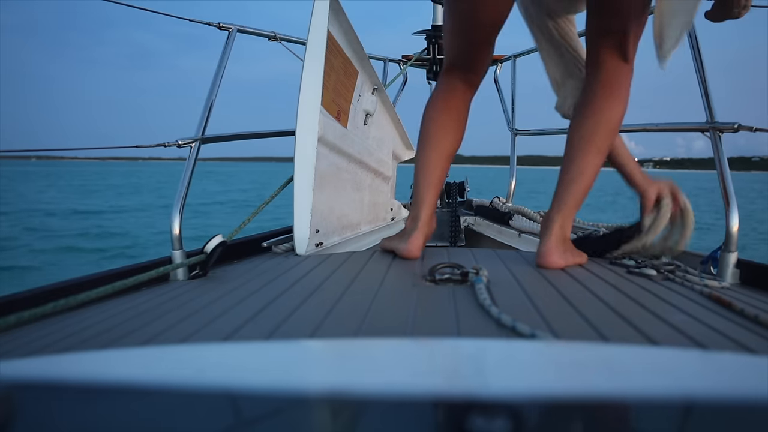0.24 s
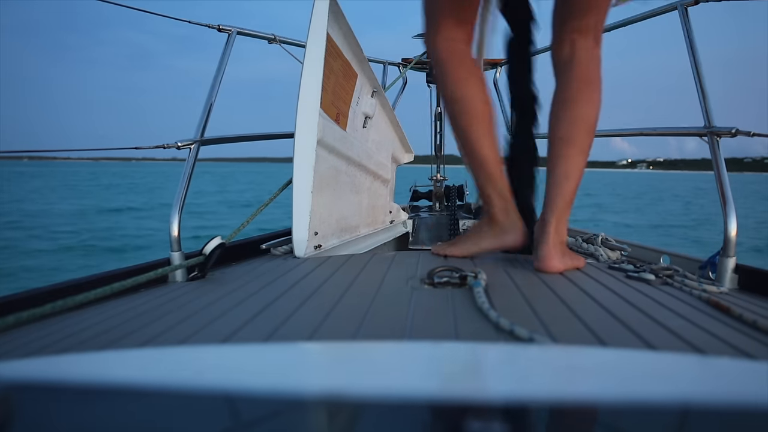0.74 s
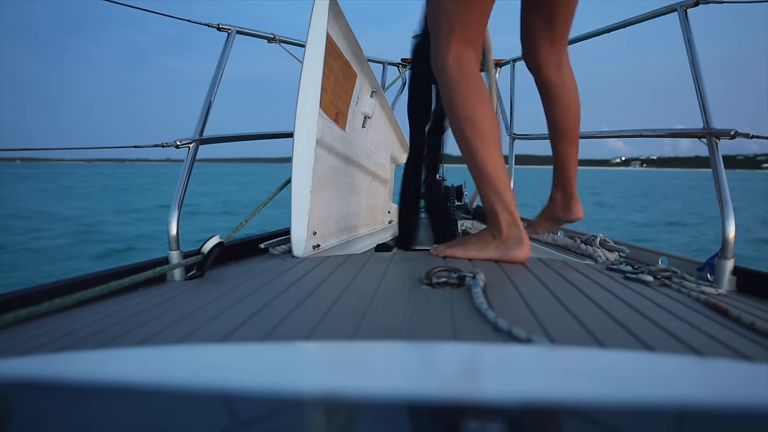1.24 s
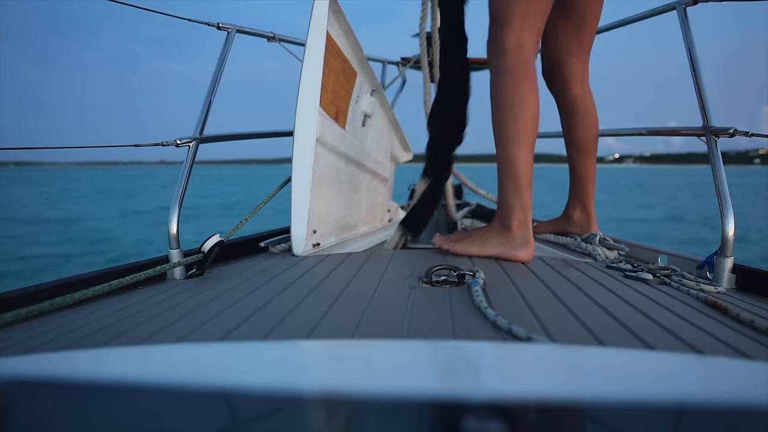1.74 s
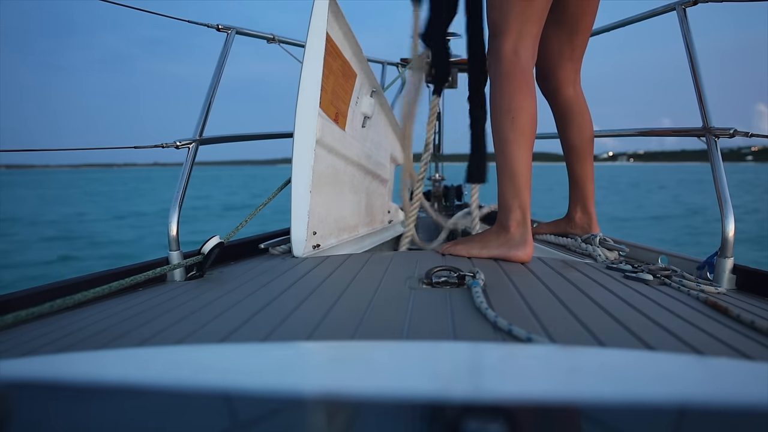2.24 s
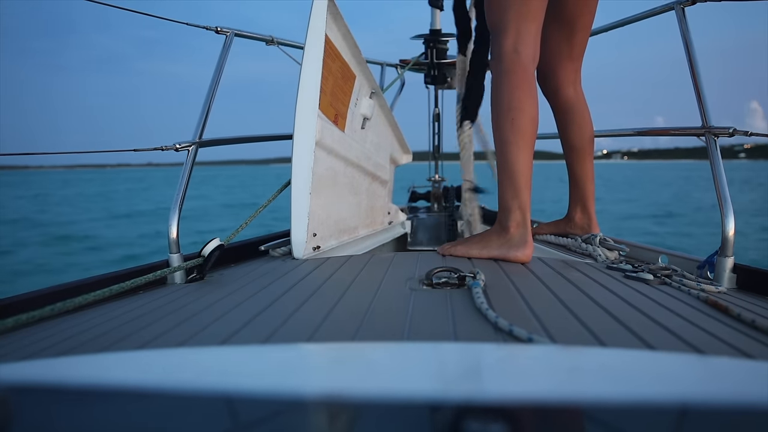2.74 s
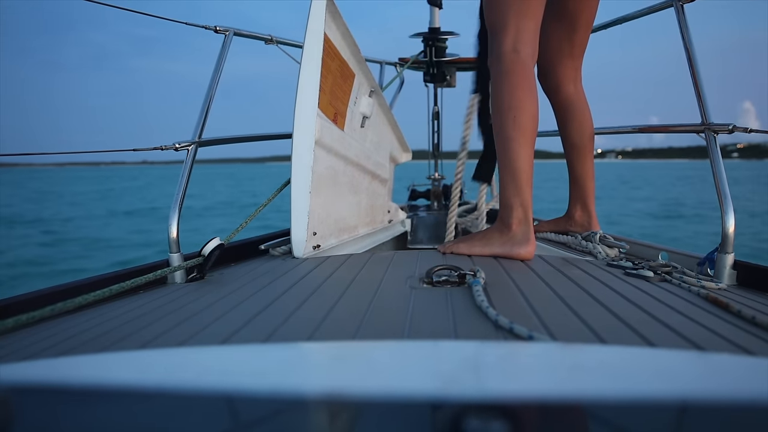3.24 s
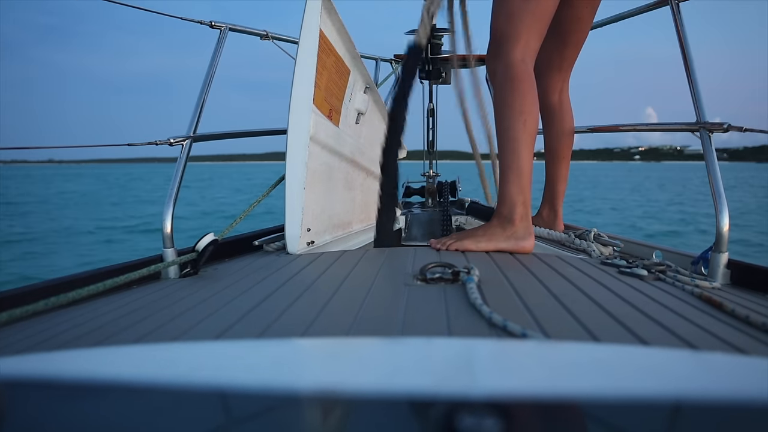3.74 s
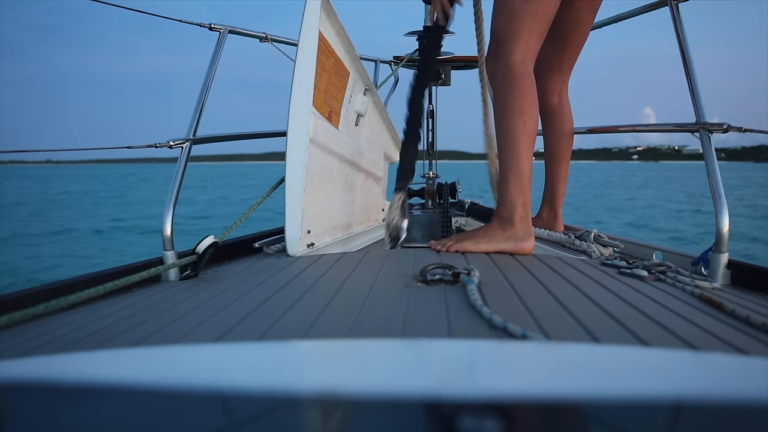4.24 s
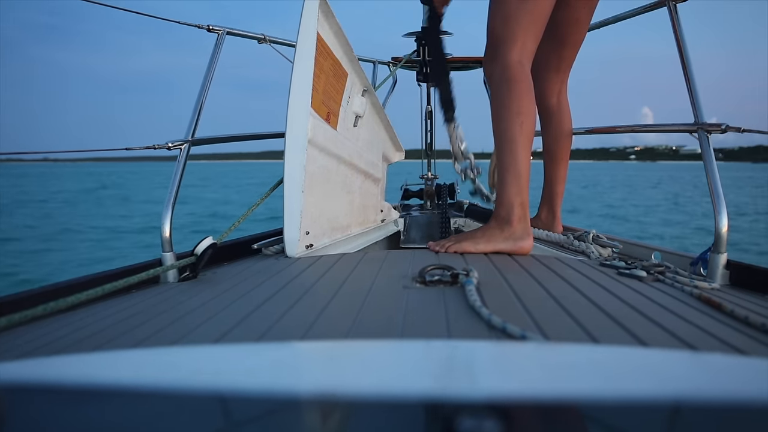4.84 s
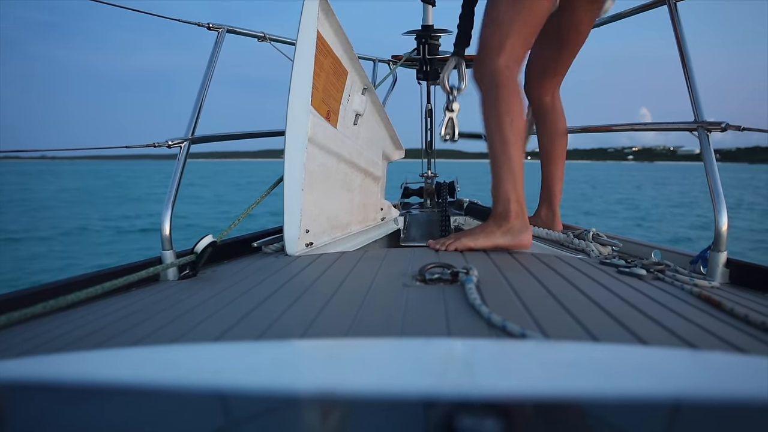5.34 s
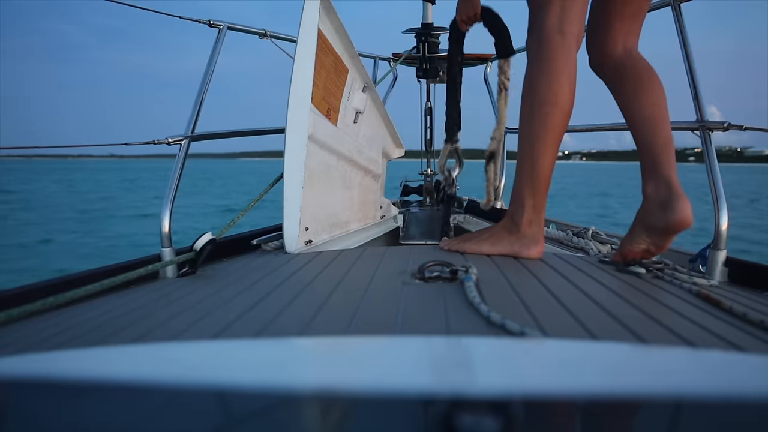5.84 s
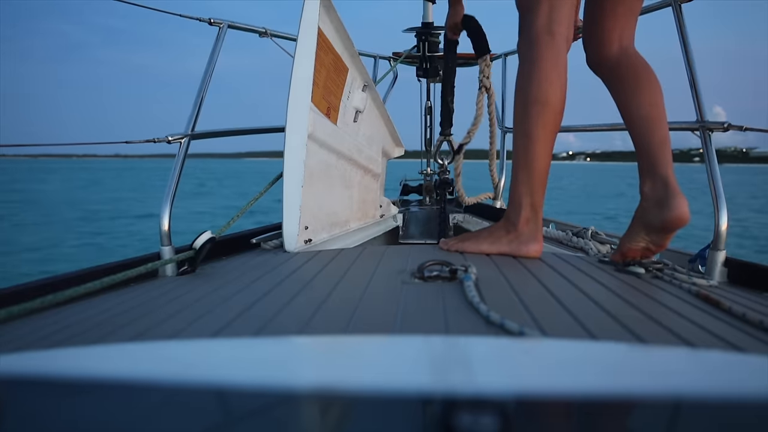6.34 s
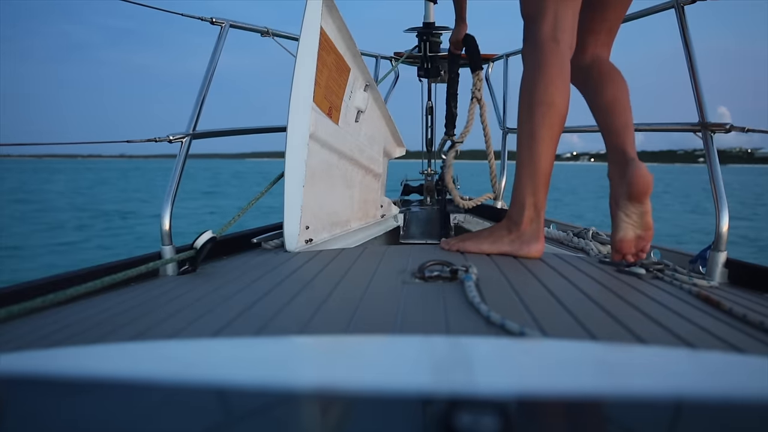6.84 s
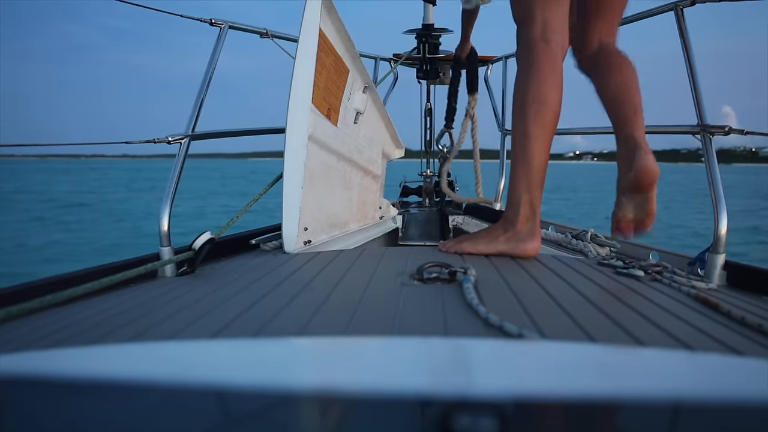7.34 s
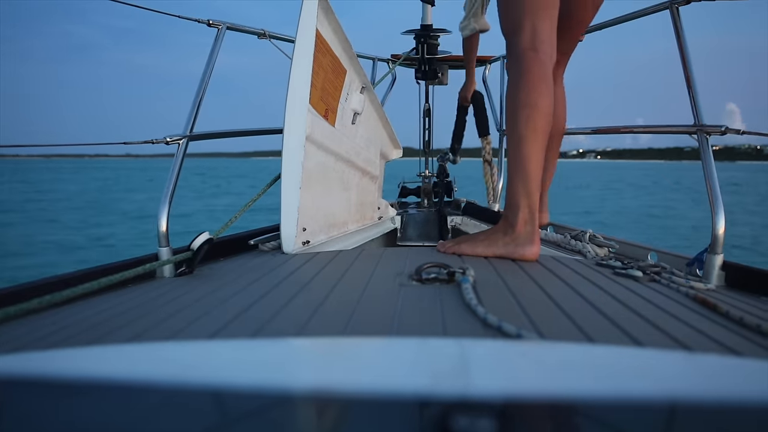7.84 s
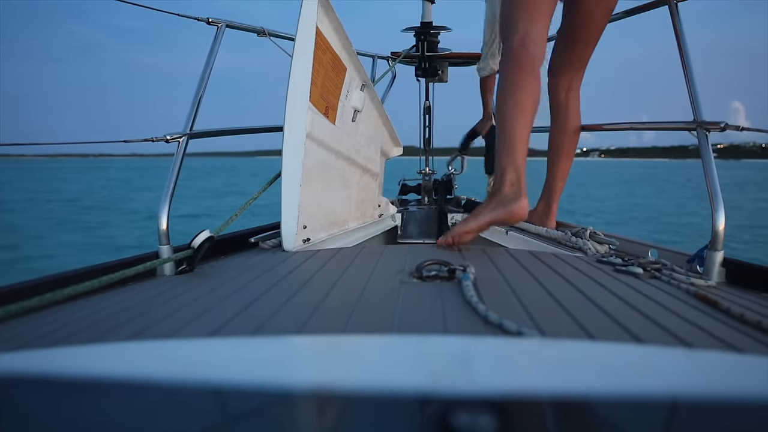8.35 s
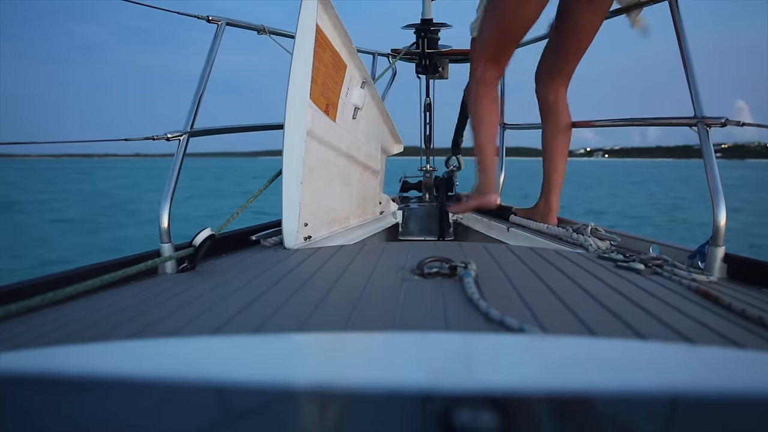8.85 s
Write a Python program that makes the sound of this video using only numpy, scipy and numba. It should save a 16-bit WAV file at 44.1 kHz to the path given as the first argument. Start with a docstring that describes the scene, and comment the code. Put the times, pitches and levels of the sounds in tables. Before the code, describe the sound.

On a boat's bow, wind rumbles deep and uneven at a close microphone, with hard buffets near 0.1, 0.4, 1.1 and 2.65 s, some with tiny clicks, over a faint water wash. Rope and bare feet brush the deck quietly, a small tap at 0.7 and a dull rub at 2.6. Rope slaps a hollow panel around 3.1 to 3.3. At 3.5 a buffet and sharp clink arrive together; knocks build to a loud bright clank at 4.1, the hook ringing on briefly. Quieter wind, light ticks and footfalls follow until a short clink at 5.5. From 5.7 chain runs over drum and roller: dense grinding rattle, hollow knocks, steel cracks, the hardest at 6.9, a faint high whistle. It thins around 7.5 to 7.9, bursts sharply and brightly at 8.0 to 8.2, surges weakly at 8.7, then ends in low grinding, sparse clinks and a dull step near 9.

```python
"""Anchor chain on a windy foredeck

On a yacht at anchor a rope bridle is handled, and its hook, made of ringing modes, knocks and clinks on the chain.
Then the windlass runs: swarms of impacts and struck modes grind and clatter over drum and bow roller and drum
the hollow deck. Wind rumbles and shoves at the microphone, with clicks as the recorder's gain steps down, over a
faint wash of water. All but the wind sits dead centre, with no distance or echo added; a limiter ducks on
strong gusts and blows."""
import sys
import numpy as np
from scipy import signal
from scipy.fft import rfft, irfft
from scipy.io import wavfile
from scipy.ndimage import uniform_filter1d
from numba import njit

SR = 44100
rng = np.random.default_rng(int(sys.argv[2]) if len(sys.argv) > 2 else 0)


def output_pcm(signal):
    """Save a mono or channel-first signal as 16-bit PCM at the path in sys.argv[1].

    Samples are clipped to [-1, 1] before scaling.
    """
    pcm = np.clip(np.atleast_2d(signal).T, -1, 1) * 32767
    wavfile.write(sys.argv[1], SR, np.round(pcm).astype(np.int16))


N = 400863
TIME = np.arange(N) / SR
SIZE = 2 ** 14  # filter length in samples
FREQ = np.arange(SIZE // 2 + 1) * SR / SIZE

# Level columns are relative: functions may add their own trims in dB.
# Spectra give only a shape: colour() scales each one to unit power.


def amp(db):
    """Decibels to gain."""
    return 10 ** (np.asarray(db) / 20)


def unit(x):
    """Scale to rms 1."""
    return x / np.sqrt(np.mean(x ** 2))


def curves(rows):
    """The columns of a table, joined by straight lines in time."""
    s, *columns = np.transpose(rows)
    return [np.interp(TIME, s, c) for c in columns]


def walk(rate):
    """Random wandering with rms 1, through this many points a second."""
    points = rng.standard_normal(int(TIME[-1] * rate) + 2)
    return unit(np.interp(TIME * rate, np.arange(len(points)), points))


def strays(start_s, end_s, spread_db, count):
    """Small events at random: rows of (t/s, level/dB off their usual level)."""
    return rng.uniform([start_s, -abs(spread_db)], [end_s, abs(spread_db)], (count, 2))


def contour(points):
    """A spectrum in dB on the frequency grid, joined along log frequency."""
    hz, db = np.transpose(points)
    return np.interp(np.log(FREQ + 1e-3), np.log(hz), db)


def colour(x, db):
    """Causal minimum-phase filter with this dB response; white noise keeps its power."""
    cepstrum = irfft(np.log(unit(amp(db))), SIZE)
    # folding the cepstrum forward makes the filter causal
    cepstrum[1:SIZE // 2] *= 2
    cepstrum[SIZE // 2 + 1:] = 0
    impulse = irfft(np.exp(rfft(cepstrum)), SIZE)
    return signal.oaconvolve(x, impulse)[:N]


def add(track, s, sound):
    """Mix a sound into a track at a time."""
    start = int(np.clip(s * SR, 0, N - 1))
    track[start:start + len(sound)] += sound[:N - start]


def fade(t, t60):
    """Exponential decay by 60 dB in t60 seconds."""
    return np.exp(-np.log(1000) * t / np.maximum(t60, 1e-3))


def contacts(rate, spread_db, t60):
    """Envelope of a swarm of uneven little impacts, each sharp at the front; its slow level is even."""
    hit = rng.random(N) < rate / SR
    energy = np.zeros(N)
    energy[hit] = amp(spread_db * rng.standard_normal(N)[hit]) ** 2
    power = signal.lfilter([1], [1, -fade(1 / SR, t60) ** 2], energy) + 1e-9
    return np.sqrt(power / uniform_filter1d(power, SR // 10))


def blows(rows, rise_s, hold_s, thump_linger, scrape_linger, grain):
    """White bursts for clack, thump and scrape; a harder blow scrapes more and thumps less."""
    t = np.arange(-SR // 20, SR // 3) / SR
    power = np.zeros((3, N))
    for s, force, hardness, t60 in rows:
        levels = (force, force - hardness, force + hardness)
        for track, db, linger in zip(power, levels, (1, thump_linger, scrape_linger)):
            rise = np.exp(np.minimum(t, 0) / rise_s)
            shape = rise * fade(np.maximum(t - hold_s, 0), t60 * linger)
            add(track, s + t[0], (amp(db) * shape) ** 2)
    return np.sqrt(power) * grain * rng.standard_normal((3, N))


def steel(modes, edges_hz, levels_db, ring, detune, scatter_db):
    """One struck piece of steel; the point of contact decides how strongly each group of modes speaks."""
    hz, db, t60 = np.transpose(modes)
    t = np.arange(min(int(t60.max() * SR), SR), dtype=np.float32) / SR
    chance = rng.standard_normal((3, len(hz)))
    group_db = np.array(levels_db)[np.searchsorted(edges_hz, hz)]
    size = amp(db + group_db + scatter_db * chance[0]) * np.sign(chance[1])
    damping = np.float32(np.log(1000) / (t60 * max(ring, .1)))
    turning = np.float32(2 * np.pi * hz * (1 + detune * chance[2]))
    return np.float32(size) @ (np.exp(-damping[:, None] * t) * np.sin(turning[:, None] * t))


# hollow deck and roller, bow: (f/Hz, full width at half the dB/Hz, level/dB above the rest at full share)
DECK = [(222, 22, 6), (280, 40, 4), (352, 25, 4), (392, 30, 5), (552, 45, 5.5), (655, 30, 3), (764, 25, 5),
        (933, 35, 3), (1135, 40, 4), (1420, 40, 4), (1624, 25, 3), (2225, 32, 6), (2760, 60, 4),
        (3070, 90, 7), (3300, 150, 5), (5150, 250, 5), (5800, 200, 4), (7950, 400, 7)]


def deck_resonance(share=0.83):
    """Peaks in dB that the hollow deck and the roller lay over a spectrum."""
    return share * sum(db / (1 + (2 * (FREQ - hz) / width) ** 2) for hz, width, db in DECK)


# chain at the bow: runs, slackens, surges twice, ends in a low grind:
# (t/s, grinding level/dB, scraping level/dB)
RUN = [(5.68, -31, -73), (5.769, -38, -47), (5.881, -23, -36), (6.04, -23, -40), (6.3, -21.5, -36),
       (6.869, -23, -36), (7.45, -32, -43), (7.69, -32, -46), (7.929, -38.5, -45), (8.06, -24, -25.5),
       (8.22, -23.5, -63), (8.3, -29, -55), (8.54, -34.5, -57), (8.661, -25, -40), (8.78, -50, -82),
       (9.09, -36, -59)]
FULL_SCRAPE_DB = -38  # reference scraping level for the sounds that follow the chain
# grinding spectrum: (f/Hz, level/dB per Hz)
GRIND_SPECTRUM = [(40, -2.5), (110, 14.5), (200, 1.5), (400, -0.5), (800, -1.5), (1400, -10.5),
                  (2200, -8.5), (3200, -22.5), (3900, -18), (7000, -51)]
# scraping spectrum, also that of hard blows: (f/Hz, level/dB per Hz)
SCRAPE_SPECTRUM = [(2000, -19), (3600, 5.5), (4800, 3.5), (5900, 6.5), (6550, -2.5), (7300, -1.5),
                   (8300, -2), (10000, -6.5), (13000, -17), (16000, -32)]
# taut link seated on steel, here as grit and later as cracks: (f/Hz, level/dB, t60 as a share of the blow's own)
TAUT_LINK = [(1750, 1, 0.65), (2520, -10, 2), (2857, -1.5, 1.1), (3450, -4.5, 1.6), (5000, -8.5, 1.7),
             (5220, -12.5, 1.1), (6120, -9.5, 1.05), (7300, -10.5, 0.65), (8260, -8.5, 0.58),
             (9100, -31, 0.46), (10660, -26, .6)]


def running_chain(deck, grind_db=1.0, scrape_db=-1.0, grit_db=-15, surge_db=1.6, grit_t60=.03):
    """Links tumble over drum and roller in hundreds of small impacts a second; some clank like grit."""
    grind, scrape = curves(RUN)
    running = np.clip((TIME - RUN[0][0]) / 0.0089, 0, 1)
    impacts = contacts(rate=420, spread_db=4.4, t60=.042) * rng.standard_normal(N) * running
    impacts = impacts * unit(amp(surge_db * walk(45)))  # links arrive in bunches
    out = colour(impacts * amp(grind + grind_db), contour(GRIND_SPECTRUM) + deck)
    out += colour(impacts * amp(scrape + scrape_db), contour(SCRAPE_SPECTRUM) + deck)
    grit = [(hz, db, share * grit_t60) for hz, db, share in TAUT_LINK[:7]]
    for s, off in strays(RUN[1][0], CLINKS[-1][0], spread_db=6, count=150):
        db = grind[int(s * SR)] + grit_db + off
        add(out, s, amp(db) * steel(grit, [4000], (0, -3), ring=1, detune=.09, scatter_db=4))
    return out


# bow roller and drum, damped by the chain lying on them: (f/Hz, level/dB, t60/s)
ROLLER = [(566.2, 2, 0.097), (763, -10, 0.17), (970, -6, 0.049), (1147, 0, 0.089), (1390, 0, 0.032),
          (1697, -8, 0.15), (2300, -6.5, 0.025), (2740, -3.5, 0.045)]


def roller_clacks(clack_db=-7.0, uneven_db=1.5):
    """Each link that drops on the roller loads it differently and rings it at a slightly different pitch."""
    grind = curves(RUN)[0]
    out = np.zeros(N)
    for s in rng.uniform(RUN[0][0], TIME[-1], size=200):
        db = grind[int(s * SR)] + clack_db + uneven_db * rng.standard_normal()
        add(out, s, steel(ROLLER, [], [db], ring=1, detune=.07, scatter_db=4))
    return out


# link that tumbles in the running chain: (f/Hz, level/dB, t60/s)
TUMBLING_LINK = [(3050, -1, .075), (3230, 3.5, 0.051), (4310, -4, 0.12), (5350, -11, 0.065),
                 (5900, -10, 0.057), (7950, -2, 0.066)]


def tumbling_links(link_db=-44.5, follow=1.0, uneven_db=5.0, count=260):
    """Link after link tinkles as it tumbles, each at its own pitch, growing and fading with the scraping."""
    scrape = curves(RUN)[1]
    out = np.zeros(N)
    for s, off in strays(RUN[1][0], TIME[-1], spread_db=uneven_db, count=count):
        db = link_db + off + follow * (scrape[int(s * SR)] - FULL_SCRAPE_DB)
        add(out, s, amp(db) * steel(TUMBLING_LINK, [], [0], ring=1, detune=.024, scatter_db=4.5))
    return out


def link_chatter(chatter_db=-39, follow=0.96, link_hz=3190, width_hz=220):
    """Sliding links keep each other's lowest mode fluttering, growing and fading with the scraping."""
    db = chatter_db + follow * (curves(RUN)[1] - FULL_SCRAPE_DB)
    flutter = contacts(rate=55, spread_db=3.5, t60=.1) * (TIME > RUN[0][0])
    drive = flutter * amp(db) * rng.standard_normal(N)
    return colour(drive, -30 * np.log10(1 + ((FREQ - link_hz) / width_hz) ** 2))


# running gear, whistling in fits as the chain tightens and slackens: (t/s, level/dB)
WHISTLE = [(5.74, -76), (5.9, -47), (6.5, -50), (6.95, -48), (7.08, -57), (7.16, -47), (7.25, -65),
           (7.35, -62), (7.56, -45), (7.66, -79), (7.79, -52), (7.86, -70), (7.95, -50), (8.14, -54),
           (8.26, -80), (8.47, -79), (8.53, -65), (8.67, -55), (8.75, -84)]


def whistle(whistle_db=0, whistle_hz=15030, width_hz=130, upper_hz=15650, upper_db=-9,
            rasp_db=-27, rasp_width_hz=2200):
    """The running gear whistles thinly over a faint rasp; jolts of the links make it flare and break."""
    jolts = contacts(rate=150, spread_db=4, t60=.08)
    level = amp(curves(WHISTLE)[0] + whistle_db)
    drive = rng.standard_normal(N) * jolts * level * (TIME > RUN[0][0])
    peaks = [(whistle_hz, width_hz, 0), (upper_hz, width_hz, upper_db), (whistle_hz, rasp_width_hz, rasp_db)]
    response = sum(amp(db) / (1 + ((FREQ - hz) / width) ** 2) for hz, width, db in peaks)
    return colour(drive, 20 * np.log10(response))


# single knocks of chain on deck and roller, strong and weak:
# (t/s, force level/dB, hardness/dB, t60/s of the clack)
KNOCKS = [(3.342, -33, -8, 0.05), (3.518, -17.5, -0.5, 0.15), (3.6, -40.5, -15.5, 0.18),
          (3.728, -35, 11, 0.25), (3.827, -19, -6, 0.18), (3.9, -30.5, -12, 0.12), (3.942, -35, 13.5, 0.2),
          (4.014, -39, 16, 0.15), (4.042, -17.5, -6.5, 0.16), (4.063, -22, 15.5, 0.23),
          (4.103, -8, -4, 0.11), (4.114, -9.5, -0.5, 0.1), (4.151, -11.5, 0.5, 0.11),
          (4.268, -40, -1, 0.17), (5.68, -29.5, -3, 0.083), (5.774, -28.5, -7, 0.38),
          (6.075, -21, 0.5, 0.36), (6.175, -16, -2.5, 0.14), (6.442, -17.5, -0.5, 0.32),
          (6.574, -19, 0.5, 0.52), (6.657, -22, -3, 0.1), (6.674, -12, -1.5, 0.068),
          (6.755, -16.5, -2.5, 0.18), (6.865, -24.5, -5.5, 0.16), (6.89, -9, 0.5, 0.17),
          (7.309, -19.5, 6, 0.15), (7.325, -22, -6, 0.093), (7.414, -26.5, 12, 0.087),
          (7.707, -24.5, -3.5, 0.096), (7.834, -21.5, -4.5, 0.22), (7.995, -23, -5, 0.096),
          (8.026, -17.5, -1, 0.05), (8.041, -17, 1, 0.075), (8.071, -18, -1.5, 0.12), (8.128, -22, 7, 0.2),
          (8.158, -12.5, 7, 0.054), (8.179, -11, 3.5, 0.13), (8.212, -20, 1, 0.16), (8.524, -30, -5, 0.066),
          (8.853, -29, -0.5, 0.2)]
# thump of a blow: (f/Hz, level/dB per Hz)
THUMP_SPECTRUM = [(50, 5), (110, 3.5), (250, 0.5), (750, -2), (1100, -8.5), (1800, -41), (4000, -58.5)]
# clack of a blow: (f/Hz, level/dB per Hz)
CLACK_SPECTRUM = [(400, -17), (800, -6), (1150, 5), (2000, 5), (3200, -1.5), (3900, -10.5), (7000, -42)]


def knocks(deck, clack_db=-3, thump_db=-1, scrape_db=-13, crack_knock_db=-0.5, crack_hard_db=1,
           light_start_s=5.88, light_end_s=8.2, light_db=-32, light_follow=0.44, light_hard_db=1, light_t60=0.13):
    """A length of chain lands as a quick clatter that drums the deck; stray knocks come while it runs."""
    grain = contacts(rate=1100, spread_db=0.0, t60=0.047)
    grind = curves(RUN)[0]
    # each crack knocks the deck too, less so the brighter it is
    snaps = [(s, db - bright + crack_knock_db, crack_hard_db, t60) for s, db, bright, t60 in CRACKS]
    light = []
    for s, off in strays(light_start_s, light_end_s, spread_db=3, count=24):
        force = light_db + off + light_follow * (grind[int(s * SR)] - grind.mean())
        light.append((s, force, light_hard_db, light_t60))
    clack, thump, scrape = blows(KNOCKS + snaps + light, rise_s=0.00084, hold_s=0.0011,
                                 thump_linger=1.31, scrape_linger=0.94, grain=grain)
    return (amp(clack_db) * colour(clack, contour(CLACK_SPECTRUM) + deck)
            + amp(thump_db) * colour(thump, contour(THUMP_SPECTRUM) + deck)
            + amp(scrape_db) * colour(scrape, contour(SCRAPE_SPECTRUM) + deck))


def deck_booms(boom_db=-18, count=10):
    """Each knock sets the low panels of the hollow deck ringing, a softer contact more than a hard one."""
    # a narrower resonance rings longer
    panels = [(hz, db - DECK[0][2], np.log(1000) / (np.pi * width)) for hz, width, db in DECK[:count]]
    out = np.zeros(N)
    for s, force, hardness, _ in KNOCKS:
        add(out, s, steel(panels, [], [force - hardness + boom_db], ring=1.6, detune=.03, scatter_db=3))
    return out


# blows that bring out one note of deck or roller, by where they land:
# (t/s, f/Hz at the start, level/dB, t60/s, share by which the note sinks as the load eases)
THUDS = [(3.831, 274.4, -13, 0.18, .08), (3.828, 1470, -16.5, 0.09, 0.25), (3.902, 760, -29, 0.19, 0.22),
         (4.043, 861, -7.5, 0.12, 0.57), (4.072, 441, -11, .17, 0.37), (4.104, 1043, -8, 0.1, 0.17),
         (3.645, 280, -31, 0.21, 0), (4.112, 280, -15, .13, .1), (4.157, 218, -17, .12, 0.12),
         (6.893, 569, -8, 0.14, 0.048), (6.993, 550, -26, 0.13, 0.15), (7.089, 572, -16.5, 0.13, 0.038),
         (7.194, 565, -18, 0.18, 0.038), (7.297, 585, -18, 0.21, 0.023), (8.027, 900, -6.5, 0.037, 0.085),
         (8.042, 1485, -11, 0.11, 0.087), (8.129, 1400, -16, 0.065, 0), (8.181, 1792, -17, 0.16, 0.098)]


def thuds(thud_db=0, build_s=0.0018, ease_s=0.0295, upper_ratio=1.37, upper_db=-9):
    """A blow sounds one hollow note with a weaker one above it; any sinking follows the easing load."""
    t = np.arange(SR // 3) / SR
    out = np.zeros(N)
    for s, hz, db, t60, sink in THUDS:
        pitch = hz * (1 - sink * (1 - np.exp(-t / ease_s)))
        phase = 2 * np.pi * np.cumsum(pitch) / SR
        notes = np.sin(phase) + amp(upper_db) * np.sin(upper_ratio * rng.uniform(.93, 1.5) * phase)
        add(out, s, amp(db + thud_db) * (1 - np.exp(-t / build_s)) * fade(t, t60) * notes)
    return out


# taut links snapping out of the drum's pockets or cracking on the roller: (t/s, level/dB, brightness/dB, t60/s)
CRACKS = [(3.52, -30, 12, 0.064), (3.629, -45, -4, 0.078), (3.83, -33, 9, 0.047), (4.015, -39, 5, 0.04),
          (4.529, -46, 11, .025), (5.774, -33.5, 6, .05), (5.88, -33, -7, 0.044), (5.921, -30.5, 0, 0.098),
          (6.177, -26, -6, 0.051), (6.298, -29, 0, 0.05), (6.381, -33.5, -12.5, 0.063),
          (6.413, -30, 4, 0.045), (6.443, -39, 3, .05), (6.658, -25, -9, 0.046), (6.752, -35, -4, 0.043),
          (6.892, -8.5, 4.5, 0.041), (6.952, -26.5, -11, 0.036), (6.992, -20.5, -2.5, 0.039),
          (7.068, -28.5, -6.5, 0.058), (7.089, -17, -3.5, 0.055), (7.165, -30, -5, 0.09),
          (7.194, -16, 0, 0.046), (7.287, -18, -1, 0.066), (7.296, -17, 5, .045), (7.491, -33, 1, 0.086),
          (8.028, -19, 2, 0.036), (8.041, -15, -8, 0.044), (8.072, -30, -8, .04), (8.106, -21.5, 10, 0.04),
          (8.16, -12, -5.5, 0.049), (8.181, -24, -7, 0.046), (8.213, -27, 9, 0.032), (8.289, -44, 7, 0.026),
          (8.316, -54, -2, 0.037), (8.339, -38, 1, 0.091), (8.424, -42, -10.5, 0.036),
          (8.467, -41, -10, 0.032), (8.522, -35.5, -9.5, 0.054), (8.585, -49, 3, .04),
          (8.637, -35, -5, 0.035), (8.832, -41.5, -2, 0.077), (8.852, -32, 0, 0.034),
          (8.968, -46, -7, 0.039), (9.008, -46, -9, 0.083), (9.048, -36, -7, 0.038),
          (9.061, -40, -2, 0.027)]


def cracks(ring_db=0, tick_db=1, tick_t60=0.0062):
    """Steel meets steel with an instant tick and a short, choked ring that differs from link to link."""
    t = np.arange(SR // 20) / SR
    rings, ticks = np.zeros((2, N))
    for s, db, bright, t60 in CRACKS:
        modes = [(hz, level, share * t60) for hz, level, share in TAUT_LINK]
        ring = steel(modes, [4000], (-bright / 2, bright), ring=1, detune=.03, scatter_db=2.5)
        add(rings, s, amp(db + ring_db) * ring)
        add(ticks, s, amp(db + bright + tick_db) * fade(t, tick_t60) * rng.standard_normal(len(t)))
    tick = contour([(800, -5), (2500, 9), (6000, -5.0), (8500, -10.0), (12000, -19.5), (16000, -25)])
    return rings + colour(ticks, tick)


# chain link: (f/Hz, level/dB, t60/s before each clink's own share)
LINK = [(3100, 4.5, 0.094), (3287, 3, 0.061), (4380, 1.5, 0.059), (4720, -6, 0.067), (5170, -2, 0.093),
        (5470, -2, 0.068), (6160, -2.5, 0.084), (6900, -20, 0.029), (7000, -13, 0.1), (7860, -1.5, 0.094),
        (8400, -11.5, 0.11), (10140, -14.5, 0.11), (10860, -8, 0.089), (12040, -8.5, 0.068),
        (14100, -24, .07), (16000, -20, 0.0596)]


def link_clatter(levels_db, ring, jostle_db, stagger_s=0.0045, count=6):
    """One link jostles its neighbours; they ring later, further off pitch and, with negative jostle_db, softer."""
    out = np.zeros(SR)
    for k in range(count):
        link = steel(LINK, [3700, 4700, 7000, 9000], levels_db, ring, detune=.005 + .0045 * k, scatter_db=3.5)
        # the links slide together, so the ring takes a moment to build
        link = link * (1 - np.exp(-np.arange(len(link)) / (.0015 * SR)))
        start = int(k * stagger_s * SR * rng.uniform(0.65, 1.6))
        out[start:start + len(link)] += amp(k * min(jostle_db, 0)) * link[:SR - start]
    return out


# clinks of link on link, loud and soft: (t/s, level/dB, brightness/dB, ring time as a share of the modes' own,
# accent near 8 kHz/dB, level step to each jostled neighbour/dB, where a rise counts as 0)
CLINKS = [(3.52, -16.5, 11, 0.73, 2.5, -1.5), (3.629, -30, 5.5, 0.99, -6, -2.5),
          (3.729, -30, 3.5, 1.1, 15.5, -2.5), (3.811, -31.5, 3.5, 1, 1, 0), (3.831, -25, 8, 1.04, 0, -2),
          (3.869, -20, 8, 0.95, 6, -1), (3.947, -26.5, 7, 0.66, 2.5, -1.5),
          (4.053, -20.5, 12.5, 0.83, 0, -2), (4.062, -14.5, 7.5, 0.71, 5, -3), (4.075, -19, 9, .7, -9, -1),
          (4.101, -4.5, 2, 1.1, 3, -1), (4.158, -24, 11, 0.52, -2, -1.5), (5.528, -10.5, 3.5, 0.16, -2, -4),
          (7.298, -29, 5.5, 0.56, 9, -1), (7.414, -22.5, 14.5, 0.25, -8, -7),
          (7.442, -22.5, 11, 0.4, 1, -11), (7.571, -35, -11.5, 0.67, 3, -1),
          (7.609, -27.5, -10.5, 0.41, 0, 0), (7.708, -25, -11, 0.45, 0, 0),
          (7.745, -36.5, -11, 0.61, 2, -0.5), (7.843, -20, -4, 0.61, 0, -2.5),
          (7.908, -20.5, -2, 0.36, 4, -3.5), (8.026, -16, 16, 0.49, -9, -3), (8.073, -30, 12, 1, -2, 1.5),
          (8.099, -22.5, 19, 0.55, 1, 0), (8.211, -24, 15.5, 0.25, -2, -1.5), (8.367, -30, -4, 0.39, 6, -2),
          (8.426, -37, -10, 0.35, 0, -6), (8.68, -24.5, -9, 0.33, -2, -3), (8.852, -23, -5, 0.4, -8, -2.5)]
# links dropping off the drum at an uneven pace: (t/s, level/dB)
CHINKS = [(5.592, -37.5), (5.721, -48.5), (5.778, -36), (5.818, -35.5), (5.883, -23.5), (5.949, -31),
          (6.092, -27), (6.135, -40), (6.222, -39), (6.308, -28), (6.39, -38), (6.563, -25.5), (6.635, -30),
          (6.76, -27), (6.995, -27.5), (7.045, -34), (7.12, -35), (7.209, -36), (8.52, -41), (9.05, -43)]


def clinks(low_db=-6, second_db=-14, middle_db=-13, top_db=-15,
           chink_bright_db=-6.5, chink_ring=0.82, chink_jostle_db=-2.2):
    """Links ring briefly against each other, brighter ones in their upper modes; chinks favour the lowest."""
    chinks = [(s, db, chink_bright_db, chink_ring, 0, chink_jostle_db) for s, db in CHINKS]
    out = np.zeros(N)
    for s, db, bright, ring, accent, jostle in CLINKS + chinks:
        levels = (low_db - bright, second_db - bright / 3, middle_db + bright,
                  top_db + bright + accent, top_db + bright)
        add(out, s, amp(db) * link_clatter(levels, ring, jostle))
    return out


# single links that hang free and sing on one note: (t/s, f/Hz, level/dB, t60/s)
FREE_RINGS = [(.7, 3070, -27, 0.052), (.7, 2390, -39, .06), (3.52, 3391, -19, 0.097),
              (3.52, 1940, -36, .07), (3.524, 4600, -23, .07), (3.522, 4050, -28, .08),
              (3.63, 6940, -36, .12), (3.73, 2180, -38, 0.15), (3.765, 3420, -32.5, 0.21),
              (3.942, 2800, -33, 0.086), (4.016, 2830, -36, .07), (4.064, 7930, -10, .06),
              (4.073, 5200, -13, .08), (4.102, 3335, -3.5, 0.12), (4.102, 3170, -4, 0.1),
              (4.267, 4129, -44, 0.069), (7.416, 5240, -28, 0.057), (8.03, 5050, -19, .12),
              (8.074, 5100, -23, 0.16), (8.127, 5150, -14, 0.074), (8.105, 5100, -0.5, 0.057),
              (8.104, 8000, -0.5, 0.028), (8.106, 10900, -13, 0.11), (8.138, 5480, -11, .05),
              (8.039, 6050, -23, .05)]


def free_rings(ring_db=0, build_s=0.0032):
    """A link that swings clear of its neighbours holds one note."""
    t = np.arange(SR // 3) / SR
    build = 1 - np.exp(-t / build_s)
    out = np.zeros(N)
    for s, hz, db, t60 in FREE_RINGS:
        add(out, s, amp(db + ring_db) * build * fade(t, t60) * np.sin(2 * np.pi * hz * t))
    return out


# hook struck and left to ring: (t/s, level/dB near 3.2 kHz, level/dB near 5.2 kHz, level/dB near 6.1 kHz,
# level/dB above 7 kHz, ring time as a share of the modes' own, f/Hz the chain's pull adds to the lowest note)
HOOK_HITS = [(3.746, -52, -37, -43, -58, 1, 2), (3.877, -43, -42, -26, -31.5, 0.69, 3),
             (3.967, -31, -48, -29, -59, 0.4, 16), (4.103, -18, -19, -13.5, -23, 0.64, 58),
             (4.159, -13, -42, -23, -27, 0.53, 53.5), (4.277, -39.5, -52, -46, -62, 0.98, 4),
             (4.34, -49, -52, -70, -52, 0.65, -7), (4.516, -41.5, -47, -69, -66, 0.64, 3.5),
             (4.53, -42, -43, -43, -65, 0.64, 2.5), (4.557, -46, -40.5, -52, -72, 0.6, -2),
             (4.823, -39.5, -37, -37, -70, 0.26, -1), (5.504, -29.5, -35, -39, -55, 0.7, 38)]
# hook: (f/Hz, level/dB, t60/s before each hit's own share)
HOOK = [(3155, 0, .5), (3182, -12, .5), (3225, -14, .35), (5168, -3, .3), (5453, -13, .45), (6083, -1, .36),
        (6116, -8, .3), (6636, -10, .3), (7450, -14, .25), (8000, -4, .15), (10460, -11, .45),
        (11160, -1, .6), (11187, -9, .5), (12145, -6, .15)]


def hook(hook_db=0, slacken_s=0.086, build_s=.002):
    """The heavy hook rings on at its own notes; the lowest glides home as the chain's pull lets go."""
    hz, db, t60 = np.transpose(HOOK)
    t = np.arange(SR * 2 // 3) / SR
    group = np.searchsorted([4000, 5800, 7000], hz)
    build = 1 - np.exp(-t / build_s)
    out = np.zeros(N)
    for s, *levels, ring, sharp_hz in HOOK_HITS:
        cycles = np.outer(hz, t)
        cycles[0] += np.cumsum(sharp_hz * np.exp(-(t / slacken_s) ** 4)) / SR
        size = amp(hook_db + db + np.array(levels)[group] + rng.standard_normal(len(hz)))
        notes = fade(t, t60[:, None] * ring) * np.sin(2 * np.pi * cycles)
        add(out, s, build * (size @ notes))
    return out


# single brushes of rope and bare feet on the deck, strong and weak:
# (t/s, force level/dB, hardness/dB, t60/s of the rub)
SCUFFS = [(.206, -54.5, -12, .03), (.257, -56, -15, .025), (.318, -53.5, 14, .025), (.356, -54, 10, .03),
          (.585, -46, -3, 0.13), (.85, -49.5, 5, 0.062), (.699, -31.5, -1.5, 0.038), (.776, -45.5, -2, 0.3),
          (1.36, -49, 6, .08), (1.7, -48.5, -12, 0.045), (2.178, -48.5, -1, 0.05), (2.564, -32.5, -2, 0.04),
          (3.082, -42.5, 1, 0.19), (3.187, -47.5, -3, 0.11), (4.315, -49.5, -16.5, 0.064),
          (4.973, -43, 3, 0.16)]
# hiss of a brush, also that of the air over the water: (f/Hz, level/dB per Hz)
HISS_SPECTRUM = [(1000, -4), (3500, -3), (5000, -4.5), (6500, -4), (8000, -5.5), (9500, -13),
                 (12000, -16.5), (16000, -23)]


def scuffs(deck, rub_db=-3, thud_db=-1, hiss_db=-13, light_db=-54, light_hard_db=2, light_t60=0.089):
    """Rope and feet brush the deck softly, swelling to a peak; stray brushes go on until the chain runs."""
    grain = contacts(rate=1100, spread_db=4.0, t60=0.024)
    stray_brushes = strays(0, RUN[0][0], spread_db=9.0, count=14)
    light = [(s, light_db + off, light_hard_db, light_t60) for s, off in stray_brushes]
    rub, thud, hiss = blows(SCUFFS + light, rise_s=0.0063, hold_s=0.013,
                            thump_linger=2.3, scrape_linger=0.8, grain=grain)
    return (amp(rub_db) * colour(rub, contour(CLACK_SPECTRUM) + deck / 2)
            + amp(thud_db) * colour(thud, contour(THUMP_SPECTRUM) + deck)
            + amp(hiss_db) * colour(hiss, contour(HISS_SPECTRUM)))


# rope slapping a hollow deck panel: (t/s, level/dB, t60/s)
SLAPS = [(2.564, -43, 0.43), (3.071, -23.5, 0.23), (3.098, -34, 0.13), (3.348, -24.5, 0.13),
         (3.525, -30.5, 0.55), (3.635, -43, 0.12), (3.83, -25.5, 0.12), (4.56, -36, 0.18)]
# slapped deck panel: (f/Hz, half width where it is 12 dB down/Hz, level/dB)
PANEL = [(278, 37, 6.5), (422, 64, -2), (566, 120, 1), (714, 130, -9.5)]


def slaps():
    """The falling bight of rope makes one deck panel boom briefly."""
    t = np.arange(SR // 3) / SR
    push = np.zeros(N)
    for s, db, t60 in SLAPS:
        add(push, s, amp(db) * fade(t, t60))
    response = sum(amp(db) / (1 + ((FREQ - hz) / width) ** 2) ** 2 for hz, width, db in PANEL)
    return colour(push * rng.standard_normal(N), 20 * np.log10(response))


# feet treading the deck: (t/s of the peak, level/dB)
STEPS = [(.64, -29), (.77, -30), (.908, -26), (2.77, -31.5), (3.05, -30), (3.193, -26), (4.72, -30.5),
         (5.0, -36), (5.36, -25.5), (5.931, -15.5), (8.312, -22.5), (9.059, -14.5)]


def steps(step_db=0, swell_s=0.018):
    """Bare feet press on the deck with a dull, low thud."""
    t = np.arange(SR // 4) / SR
    push = np.zeros(N)
    for s, db in STEPS:
        add(push, s - swell_s, amp(db + step_db) * t / swell_s * np.exp(1 - t / swell_s))
    thud = contour([(60, 2.0), (120, 9.5), (190, 3.5), (280, -8.5), (450, -14.0), (1200, -63.5)])
    return colour(push * rng.standard_normal(N), thud)


# one short creak of the rope: (t/s of the middle, time from there to half amplitude/s, f/Hz, level/dB)
CREAK = (3.675, .028, 1150, -39)


def creak(width_hz=70):
    """The rope drags under load and excites one narrow resonance."""
    s, half_s, hz, db = CREAK
    drag = amp(db) / (1 + ((TIME - s) / half_s) ** 4)
    return colour(drag * rng.standard_normal(N), -20 * np.log10(1 + ((FREQ - hz) / width_hz) ** 2))


# wind on the microphone: (t/s, rumble level/dB)
WIND = [(0, -14), (1.1, -12), (1.24, -19.5), (1.4, -11), (2.05, -12), (2.45, -18), (2.6, -9.5),
        (2.93, -25.5), (3.03, -13), (3.7, -15.5), (3.81, -24.5), (3.9, -15.5), (4.6, -21), (4.72, -10.5),
        (5.05, -15), (5.3, -18), (5.9, -16.5), (6.85, -16), (7.1, -23), (7.8, -18), (8.1, -14),
        (8.7, -21.5), (9.09, -9.5)]
# single buffets at the microphone: (t/s, pressure level/dB, time from the middle to each pressure peak/s,
# level/dB of the recorder's gain-step clicks, share of the clicks that differs between the channels)
BUFFETS = [(0.081, 3, 0.0079, -8, 0.85), (0.414, 6.5, 0.006, -16, 0.81), (1.094, 1.5, 0.0087, -66, 0),
           (2.648, 9.5, 0.0048, -8, 0.92), (3.509, 5.5, 0.004, 0, 0), (3.662, -3, 0.0064, -53, 0),
           (3.913, -6.5, 0.0057, -60, 0), (4.194, 4, 0.0048, -60, 0), (4.997, -1, 0.0056, -66, 0),
           (5.09, -1, 0.0088, -71, 0)]
# wind rumble: (f/Hz, level/dB per Hz)
RUMBLE_SPECTRUM = [(3, -8.5), (10, -7), (20, -4), (32, -0.5), (45, -11), (60, -9.5), (80, -20), (110, -23),
                   (150, -32), (215, -40.5), (330, -51.5), (700, -60.5), (2000, -100)]


def wind(rumble_db=0, gust_db=3, gusts_per_s=9, click_trim_db=9.5, click_gap_s=0.00203, flank_db=-5):
    """Eddies rumble on the microphone; buffets shove it one way, then the other.

    Each buffet has three clicks, 2 ms apart, as of the recorder's gain stepping down on a hard gust."""
    eddies = colour(rng.standard_normal(N), contour(RUMBLE_SPECTRUM))
    # level the eddies, so that the table and the quick swells set their strength
    eddies /= np.sqrt(uniform_filter1d(uniform_filter1d(eddies ** 2, SR // 12), SR // 25))
    out = eddies * amp(curves(WIND)[0] + rumble_db + gust_db * walk(gusts_per_s))
    clicks = np.zeros((2, N))
    for s, push_db, half_s, click_db, apart in BUFFETS:
        near = np.abs(TIME - s) < half_s * 2 * np.pi
        u = (TIME[near] - s) / half_s
        bell = np.exp(-u ** 2 / 2)
        shove = amp(push_db) * u * bell * np.exp(.5)
        out[near] = out[near] * (1 - bell) - shove
        # the outer two clicks are usually weaker than the middle one
        for step in (-1, 0, 1):
            click_s = s + step * click_gap_s
            level_db = click_db + click_trim_db + flank_db * abs(step)
            size = amp(level_db + 2 * rng.standard_normal())
            lean = apart * rng.choice([-1, 1])
            add(clicks[0], click_s, [size * (1 + lean)])
            add(clicks[1], click_s, [size * (1 - lean)])
    click = contour([(60, -16), (400, -2.0), (1000, -6), (3000, -15.5), (8000, -23.0), (16000, -30.0)])
    return out + np.array([colour(channel, click) for channel in clicks])


# water and air around the boat: (t/s, wash level/dB, hiss level/dB)
SEA = [(.14, -56, -62.5), (.31, -49, -61), (.6, -46.5, -63), (1.1, -51.5, -63), (1.7, -50.5, -61.5),
       (2.6, -53.5, -62), (2.83, -57.5, -68.5), (3.25, -58, -62.5), (3.42, -46, -61), (3.57, -41.5, -54),
       (4.36, -56.5, -60.5), (4.76, -46.5, -58), (5.15, -51.5, -62.5), (5.46, -44.5, -56.5),
       (8.8, -40, -62.5)]
# wash along the hull: (f/Hz, level/dB per Hz)
WASH_SPECTRUM = [(100, -5.5), (250, 8.5), (550, -3), (800, -3), (1100, -7), (2000, -13), (2700, -18),
                 (3200, -13.5), (4000, -33.5), (8000, -46.5)]


def sea(wash_db=1.5, hiss_db=1):
    """Wavelets patter on the hull under a smooth hiss."""
    wash, hiss = curves(SEA)
    patter = contacts(rate=390, spread_db=6.0, t60=0.11) * rng.standard_normal(N)
    air = rng.standard_normal(N) * amp(hiss + hiss_db + 1.6 * walk(22))
    return colour(patter * amp(wash + wash_db), contour(WASH_SPECTRUM)) + colour(air, contour(HISS_SPECTRUM))


def scene():
    """Everything sounds from the bow, straight ahead; only the wind leans a little to one side."""
    deck = deck_resonance()
    chain = running_chain(deck) + roller_clacks() + tumbling_links() + link_chatter() + whistle()
    chain += knocks(deck) + deck_booms() + thuds() + cracks() + clinks() + free_rings() + hook()
    handling = scuffs(deck) + slaps() + steps() + creak()
    lean_db = np.array([[.22], [-.22]])
    return chain + handling + wind() * amp(lean_db) + sea()


@njit
def follower(x, attack, release):
    """Level detector, quick up and slow down."""
    out, e = np.empty(len(x)), 0.
    for i in range(len(x)):
        e += (abs(x[i]) - e) * (attack if abs(x[i]) > e else release)
        out[i] = e
    return out


def record(dry, ceiling=0.79, attack_s=0.00026, release_s=0.081, top_hz=15850):
    """A limiter ducks on strong peaks, the fastest ones clip, and the top is cut."""
    loudness = follower(dry.mean(axis=0), min(1 / (attack_s * SR), 1.), 1 / (release_s * SR))
    limited = np.clip(dry * ceiling / np.maximum(loudness, ceiling), -1, 1)
    top_cut = signal.ellip(10, .2, 80, top_hz, fs=SR, output="sos")
    return signal.sosfilt(top_cut, limited)


dry = scene()
out = record(dry)
output_pcm(out)
```